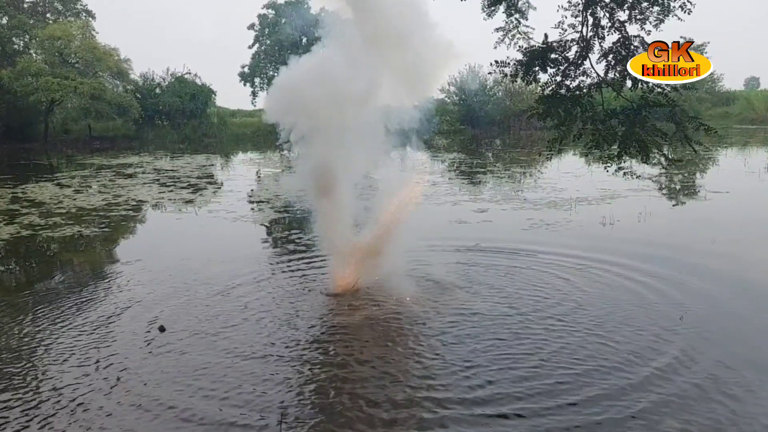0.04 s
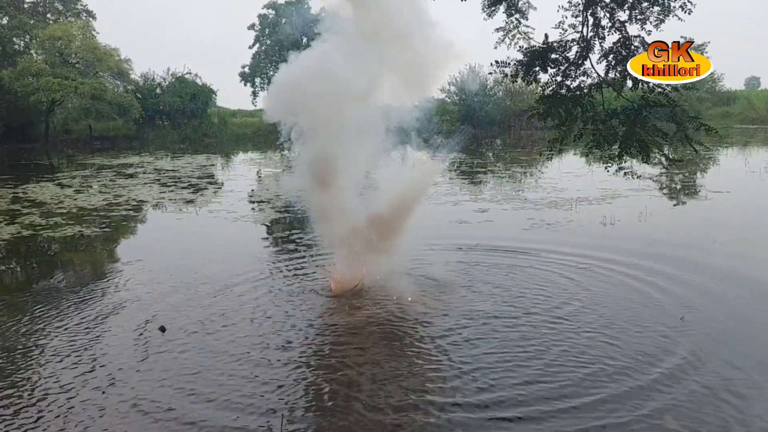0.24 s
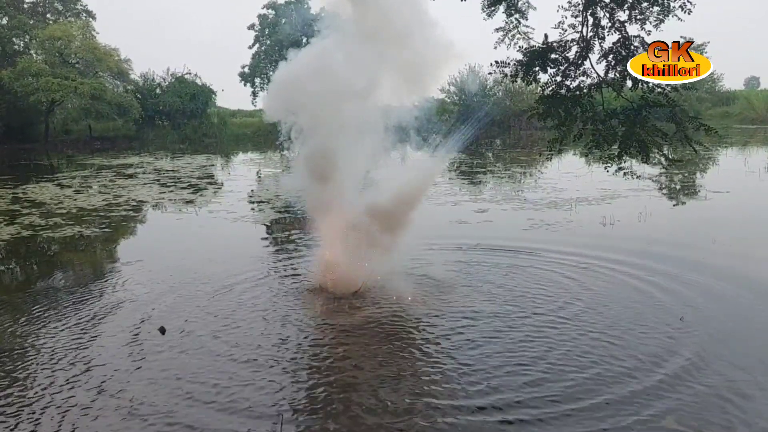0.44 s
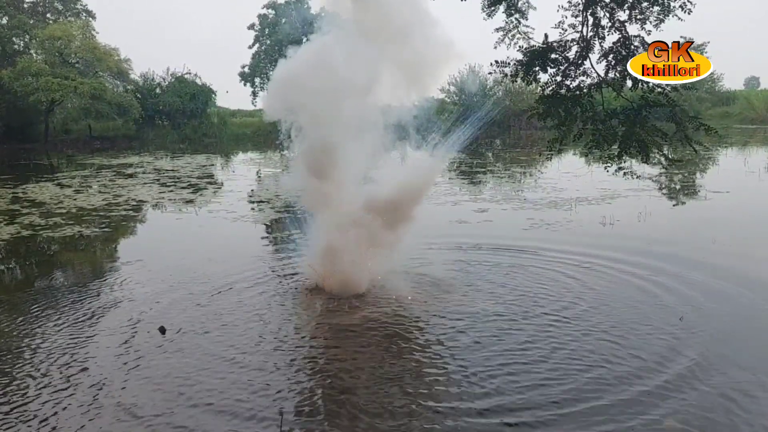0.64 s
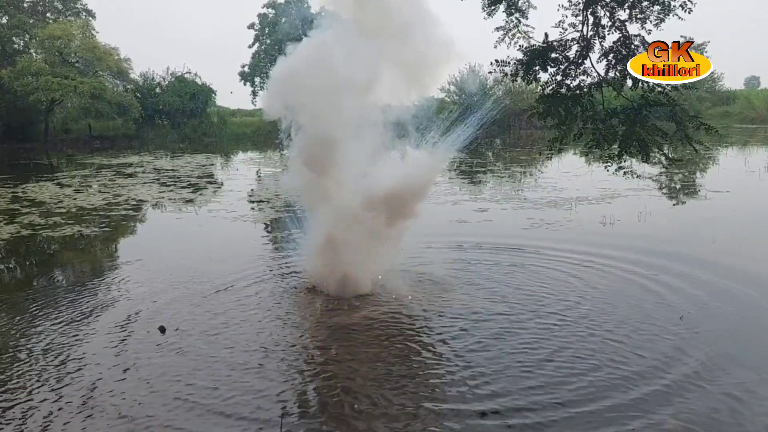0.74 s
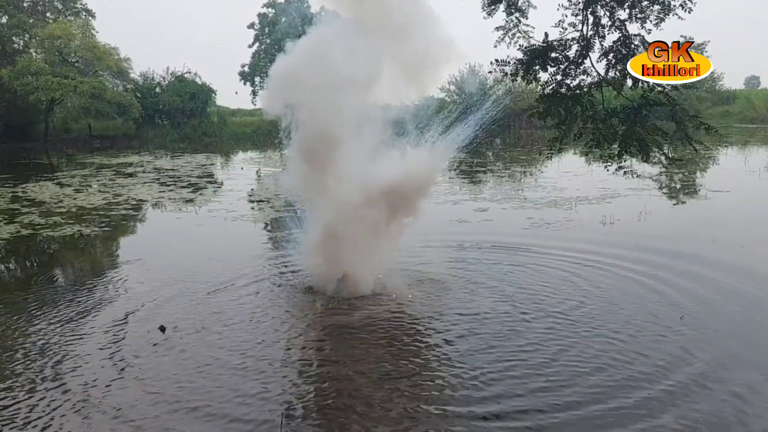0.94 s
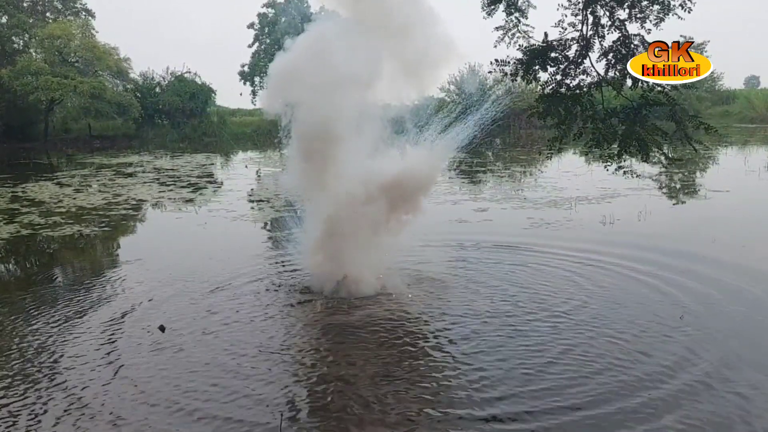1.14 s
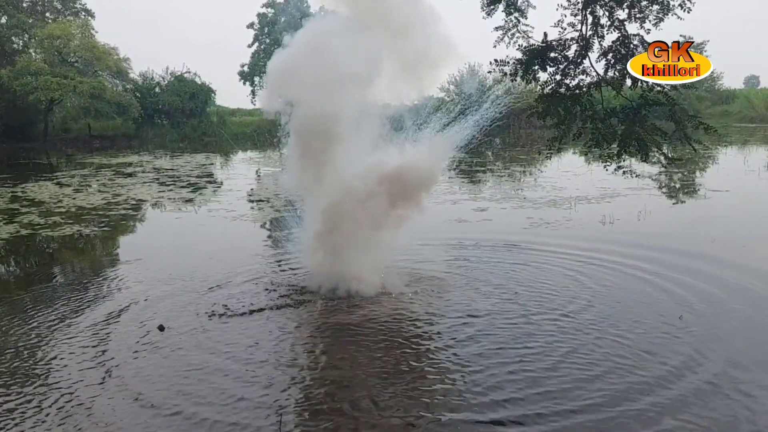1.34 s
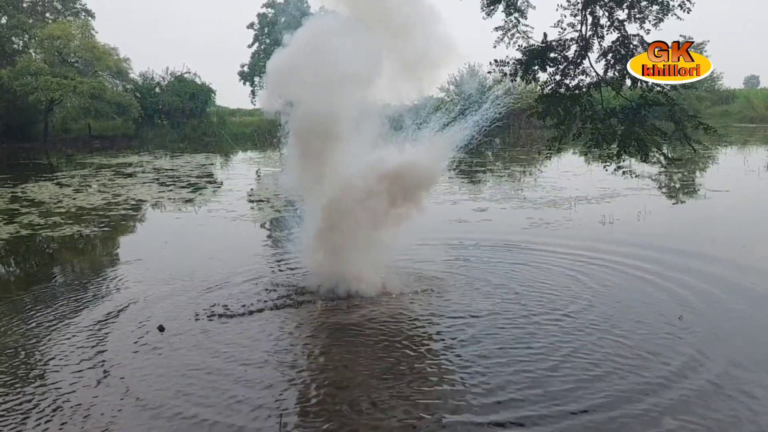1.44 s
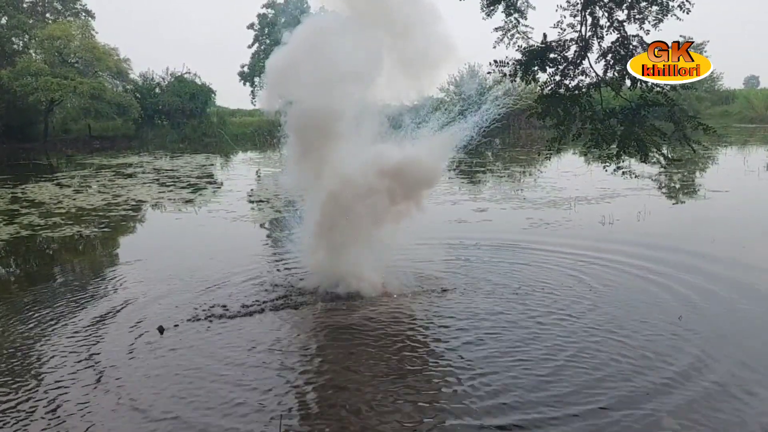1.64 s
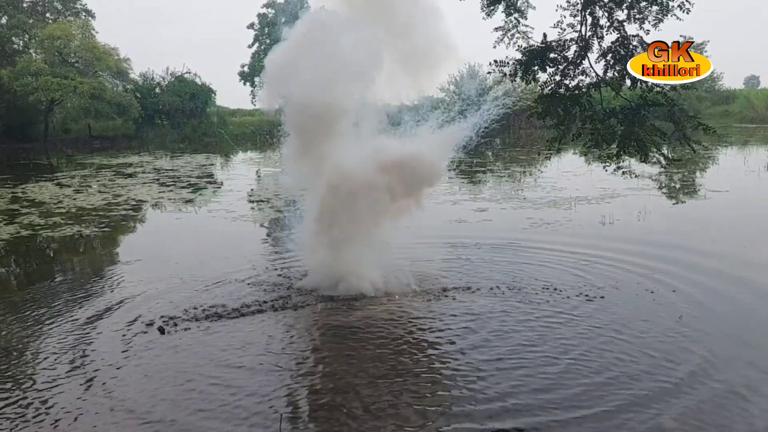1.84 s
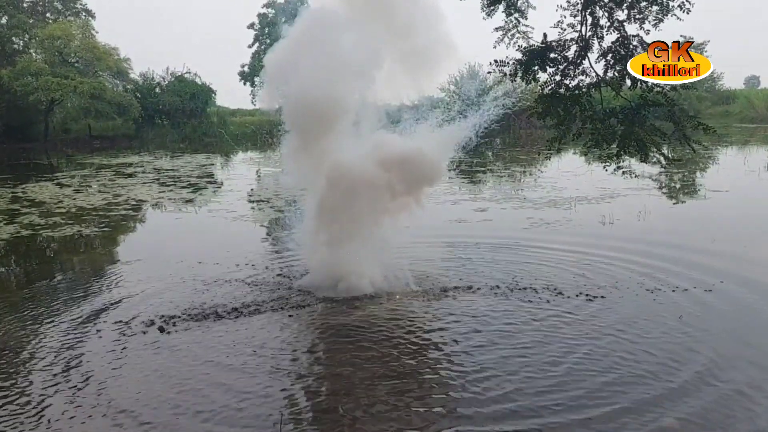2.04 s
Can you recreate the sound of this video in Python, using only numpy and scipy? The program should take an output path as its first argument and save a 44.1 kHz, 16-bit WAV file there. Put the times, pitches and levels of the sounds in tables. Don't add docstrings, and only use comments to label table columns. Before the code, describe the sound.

Five sharp bangs of sodium bursting on water, the first three strongest, the last two small. Echoes slap back and wash through the trees over faint breeze; the phone sound is dull, uneven between sides and ducks around each blast.

```python
import sys
import numpy as np
from scipy import signal
from scipy.fft import rfft, irfft
from scipy.io import wavfile
from scipy.ndimage import uniform_filter1d, minimum_filter1d

SR = 44100
rng = np.random.default_rng(int(sys.argv[2]) if len(sys.argv) > 2 else 0)


def to_wav(s):
    ch = np.atleast_2d(s).T
    pcm = np.round(np.clip(ch, -1, 1) * 32767)
    wavfile.write(sys.argv[1], SR, pcm.astype(np.int16))


def volts_from_db(level):
    exponent = np.asarray(level, float) / 20
    return 10 ** exponent


N = 92610

BANG_TIMES = [.2036, .6648, 1.1061, 1.3812, 1.6807]
# (blast level [dB], blast length [s], wash level [dB], heave level [dB])
BANG_LEVELS = [
    (11, 0.0025, -15, -23),
    (11, 0.0022, -19, -6),
    (8.5, 0.0018, -23.5, -17),
    (-5, .0027, -36.5, -31),
    (-4.5, 0.0011, -41.5, -38),
]
# (blast at right port [dB], spray [dB], tree echoes [dB])
BANG_CHARACTER = [
    (-16, 4.5, -3.5),
    (-2, 11, -27),
    (1, 7.5, 0.5),
    (-0.5, -3.5, -0.5),
    (4, 6, 3),
]


def at_hz(points, hz):
    table = np.array(points)
    return np.interp(np.log(hz), np.log(table[:, 0]), table[:, 1])


def drift(rate):
    knots = rng.standard_normal(400)
    return np.interp(np.arange(N) / SR * rate * 2, np.arange(400), knots)


def low_cut(x, hz):
    return signal.sosfilt(signal.butter(2, hz, "high", fs=SR, output="sos"), x)


def band_pass(x, low, high, order=2):
    return signal.sosfilt(signal.butter(order, [low, high], "band", fs=SR, output="sos"), x)


def blast(start, length):
    rise, swing, suction = 0.12, 0.44, 4.2
    u = np.clip((np.arange(N) / SR - start) / length, 0, 8)
    push = np.clip(u / rise, 0, 1)
    fade = np.exp(-suction * np.maximum(u - swing, 0) ** 2)
    return push * np.tanh(6 * (swing - u)) * fade


def noise_bands():
    # (pitch [Hz], likeness [share])
    likeness = [(30, 1), (120, 0.76), (250, 0.53), (500, -0.64), (1000, 0.15), (4000, -0.18)]
    edges = 18 * 2 ** np.arange(0, 9.6, 0.5)
    white = rng.standard_normal((2, 2, N + SR))
    for k, (low, high) in enumerate(zip(edges, edges[1:])):
        centre = np.sqrt(low * high)
        mid, side = band_pass(white[k % 2], low, high)[:, SR:]
        alike = np.clip(at_hz(likeness, centre), -1, 1)
        yield centre, np.sqrt(1 + alike) * mid + np.sqrt(1 - alike) * side * [[1], [-1]]


def rumble():
    level_db, lump_db = -57, 7
    noise = band_pass(rng.standard_normal((2, N + SR)), 18, 55)
    return volts_from_db(level_db + lump_db * drift(1.9)) * noise[:, SR:] / noise.std()


def wash_and_air():
    # (pitch [Hz], level per Hz [dB])
    air_colour = [(25, 4.5), (100, 0), (400, 0.5), (1000, 5), (2000, -3.5), (4000, -8), (8000, -17.5)]
    # (pitch [Hz], level per Hz [dB])
    wash_colour = [(25, 14.5), (100, 3.5), (300, 2), (1000, 0.5), (2000, -2), (4000, -2), (8000, -6.5)]
    # (pitch [Hz], time [s])
    wash_decay = [(30, 0.62), (200, 1.58), (1000, 2.95), (3000, 1.97), (7000, 0.82)]
    # (pitch [Hz], level [dB])
    spray_colour = [(100, 5.5), (400, 1), (1400, 6.5), (4000, -4), (8000, -3)]
    air_db, wash_rise_s, patch_db = -44.5, 0.025, 2
    spray_db, spray_t60_s = 9, 0.069
    tree_db, tree_delay_s, tree_width_s = 3.5, 0.054, 0.014
    crack_db, crack_t60_s, crack_above_hz = -31.5, 0.018, 3000

    out, t = 0, np.arange(N) / SR
    together = drift(24.95)
    ages = [np.maximum(t - start, 0) for start in BANG_TIMES]
    for hz, noise in noise_bands():
        power = volts_from_db(2 * (air_db + at_hz(air_colour, hz)))
        for age, bang, character in zip(ages, BANG_LEVELS, BANG_CHARACTER):
            blast_db, _, wash_db, _ = bang
            _, more_spray_db, more_tree_db = character
            slow = volts_from_db(-120 * age / at_hz(wash_decay, hz)) * (1 - np.exp(-age / wash_rise_s))
            bunch = np.exp(-((age - tree_delay_s) / tree_width_s) ** 2)
            trees = 1 + (hz > 2500) * volts_from_db(2 * (tree_db + more_tree_db)) * bunch
            spray_level = spray_db + more_spray_db + at_hz(spray_colour, hz)
            spray = volts_from_db(2 * spray_level - 120 * age / spray_t60_s) * (age > 0)
            power = power + volts_from_db(2 * (wash_db + at_hz(wash_colour, hz))) * (slow * trees + spray)
            crack = volts_from_db(2 * (blast_db + crack_db) - 120 * age / crack_t60_s)
            power = power + (hz > crack_above_hz) * (age > 0) * crack
        patches = volts_from_db(patch_db * (0.37 * together + drift(15)))
        out = out + np.sqrt(power) * patches * noise
    return 2 * out


def wall_slaps():
    slap_times = [.4252, .8834, .8846, 1.3242, 1.599, 1.9065]
    # (left level [dB], right level [dB])
    slap_levels = [
        (-5, -6.5),
        (-5, -1.5),
        (-19, -3),
        (-6.5, -3),
        (-37, -34),
        (-29, -20),
    ]
    right_lag_s, length_s = 0.0012, 0.0013
    out = np.zeros((2, N))
    for start, (left_db, right_db) in zip(slap_times, slap_levels):
        out[0] += volts_from_db(left_db) * blast(start, length_s)
        out[1] += volts_from_db(right_db) * blast(start + right_lag_s, length_s)
    return low_cut(out, 390)


def water_heave(age, level_db):
    pitch_hz, t60_s, right_shift_rad = 34.5, 0.12, 2.2
    swell = volts_from_db(level_db - 60 * age / t60_s) * (1 - np.exp(-age / 0.014))
    return swell * np.sin(2 * np.pi * pitch_hz * age + np.array([[0], [right_shift_rad]]))


def stutters():
    stutter_times = [.2061, .2088, .2113, .2148, .6697, .6750, .273, .7565]
    # (left level [dB], right level [dB], length [s])
    stutter_sizes = [
        (4, -4, .003),
        (2.5, -2.5, .0022),
        (.5, .5, .0017),
        (-.5, -1.5, .002),
        (-2.5, -5, .0022),
        (-3.5, -3, .003),
        (-14, -12, .002),
        (-15, -12, .0016),
    ]
    out = np.zeros((2, N))
    for start, (left_db, right_db, length) in zip(stutter_times, stutter_sizes):
        out += volts_from_db(np.array([[left_db], [right_db]])) * blast(start, length)
    return out


def blasts():
    near_delays = [.0028, .0053, .0078, .0115, .016, .021, .051]
    # (left level [dB], right level [dB])
    near_levels = [(-14, -30.5), (-11, -20), (-11.5, -20), (-17, -9), (-21.5, -16), (-18.5, -20),
                   (-29.5, -30.5)]
    spread_db, delay_spread = 1.5, 0.04
    out, heave = np.zeros((2, N)), np.zeros((2, N))
    t = np.arange(N) / SR
    chance = rng.standard_normal((len(BANG_LEVELS), len(near_levels), 3))
    for start, bang, character, draws in zip(BANG_TIMES, BANG_LEVELS, BANG_CHARACTER, chance):
        blast_db, length, _, heave_db = bang
        out += volts_from_db(blast_db + np.array([[0], [character[0]]])) * blast(start, length)
        for delay, side_db, draw in zip(near_delays, near_levels, draws):
            gains = volts_from_db(blast_db + np.array(side_db) + spread_db * draw[:2])
            out += gains[:, None] * blast(start + delay * (1 + delay_spread * draw[2]), length)
        heave += water_heave(np.maximum(t - start, 0), heave_db)
    return low_cut(out + stutters(), 125) + heave


def scene():
    return blasts() + wall_slaps() + wash_and_air() + rumble()


def port(x, response):
    size = 4096
    hz = np.maximum(np.arange(size // 2 + 1) * SR / size, 1)
    cepstrum = irfft(np.log(volts_from_db(at_hz(response, hz))))
    cepstrum[1:size // 2] *= 2
    cepstrum[size // 2 + 1:] = 0
    return signal.fftconvolve(x, irfft(np.exp(rfft(cepstrum))))[:N]


def both_ports(dry):
    # (pitch [Hz], level [dB])
    left_response = [(20, 1), (700, -3), (1100, -5), (2100, -20.5), (2900, -30), (3800, -18.5),
                     (5000, -13.5), (7800, -11.5)]
    # (pitch [Hz], level [dB])
    right_response = [(20, -1.5), (200, -0.37), (1500, -2.45), (2200, 1), (3100, -6.5), (4600, 4),
                      (6200, -0.5), (7800, -6)]
    return np.array([port(dry[0], left_response), port(dry[1], right_response)])


def band_limit(x, cutoff_hz):
    leak_db, patch_db = -27.5, 9
    leak = band_pass(x, 9680, 10220, order=4)
    patches = np.array([drift(22), drift(22)])
    kept = signal.sosfilt(signal.ellip(10, 0.5, 60, cutoff_hz, fs=SR, output="sos"), x)
    return kept + volts_from_db(leak_db + patch_db * patches) * leak


def limiter(x):
    limit_db, release_db_per_s = -0.4, 226.5
    look_ahead_s, smooth_s = 0.011, 0.012
    over = np.maximum(20 * np.log10(np.abs(x).max(axis=0) + 1e-9) - limit_db, 0)
    ramp = release_db_per_s * np.arange(N) / SR
    recovering = np.maximum.accumulate(over + ramp) - ramp
    nearby_peak = -minimum_filter1d(-over, 2 * int(look_ahead_s * SR) + 1)
    cut_db = uniform_filter1d(np.maximum(recovering, nearby_peak), size=int(smooth_s * SR))
    return x * volts_from_db(-cut_db)


def top_cut(x):
    return signal.sosfilt(signal.butter(12, 15400, fs=SR, output="sos"), x)


def record(dry):
    cutoff_hz, crest = 7850, 0.5
    x = limiter(band_limit(both_ports(dry), cutoff_hz))
    x = x + 0.03 * low_cut(np.clip(x, -crest, crest), cutoff_hz)
    return top_cut(np.clip(x, -1, 1))


dry = scene()
out = record(dry)
to_wav(out)
```